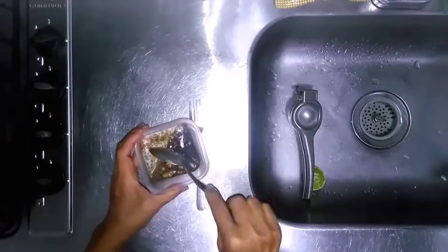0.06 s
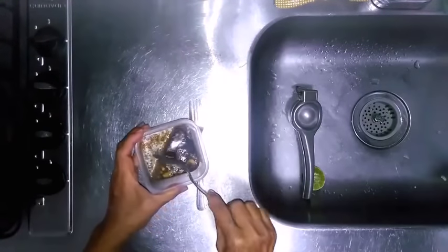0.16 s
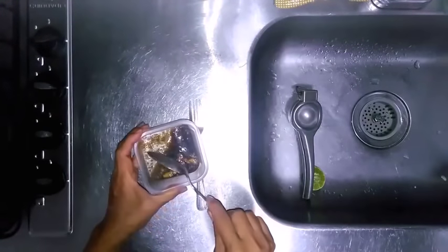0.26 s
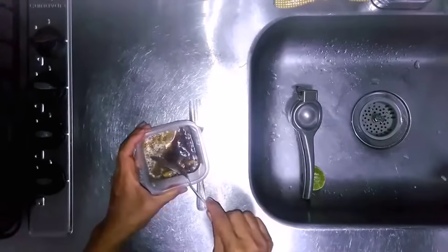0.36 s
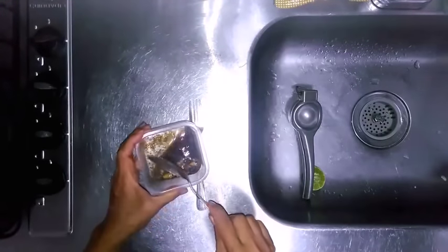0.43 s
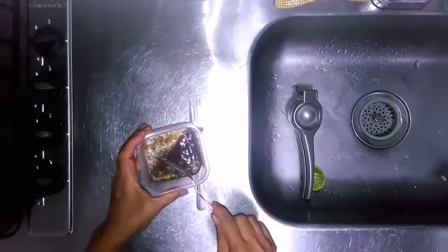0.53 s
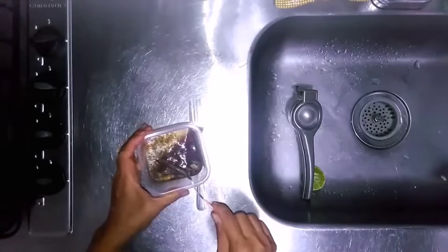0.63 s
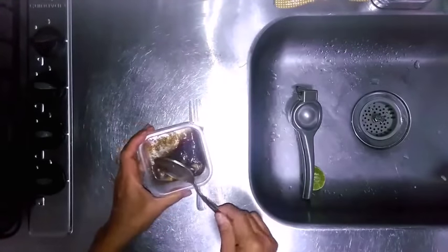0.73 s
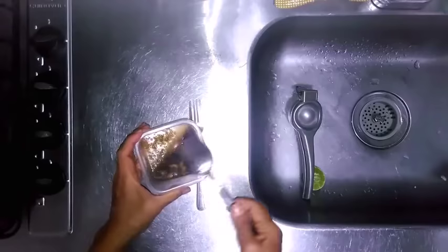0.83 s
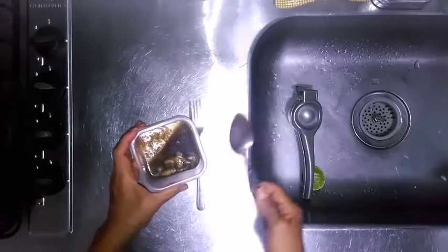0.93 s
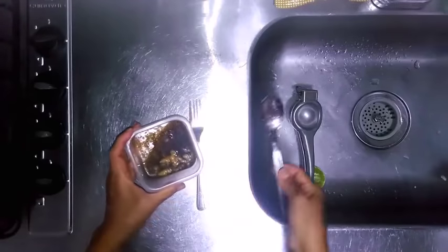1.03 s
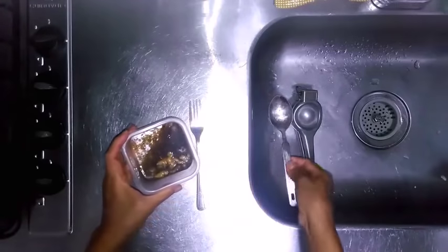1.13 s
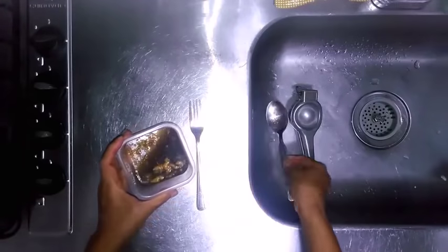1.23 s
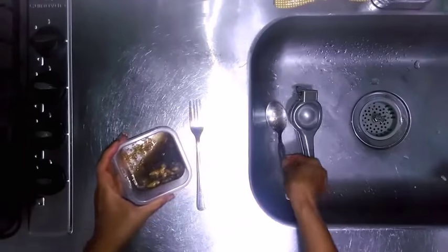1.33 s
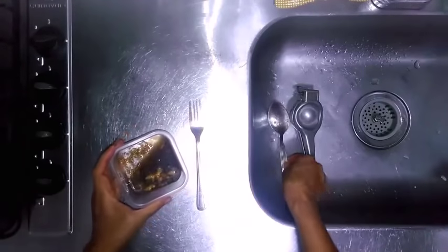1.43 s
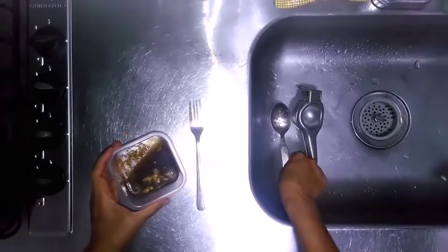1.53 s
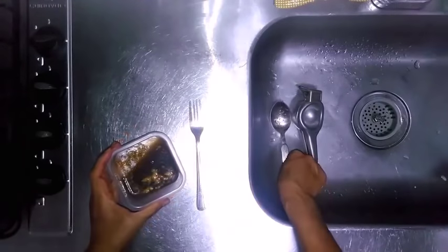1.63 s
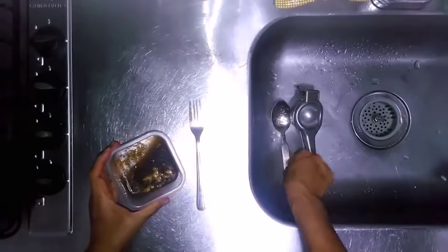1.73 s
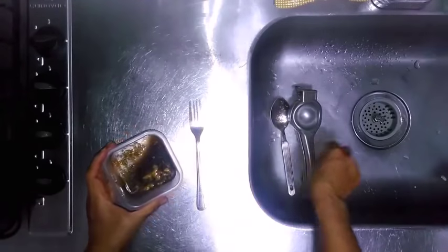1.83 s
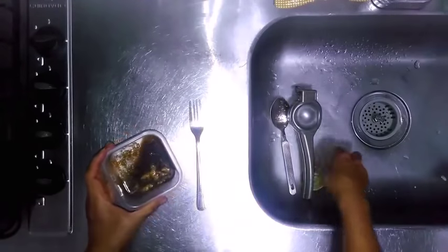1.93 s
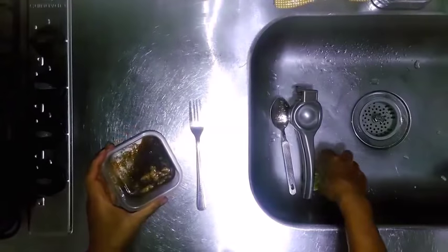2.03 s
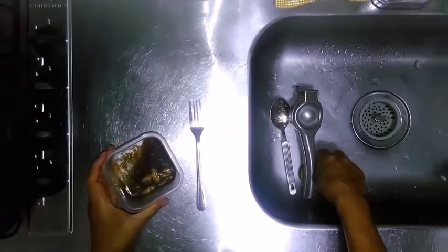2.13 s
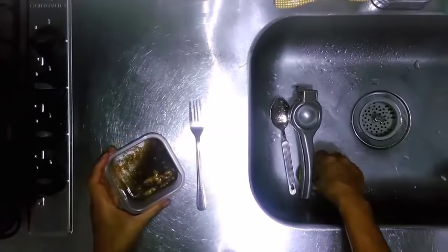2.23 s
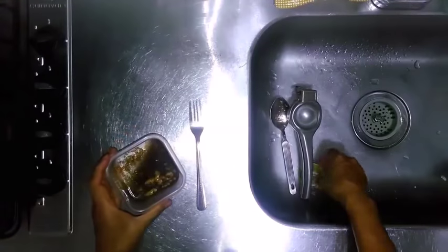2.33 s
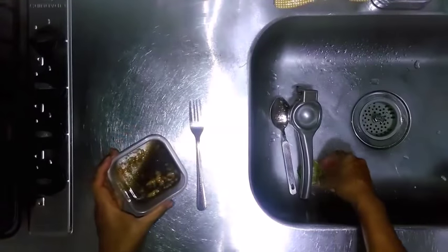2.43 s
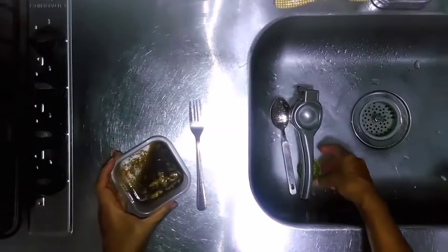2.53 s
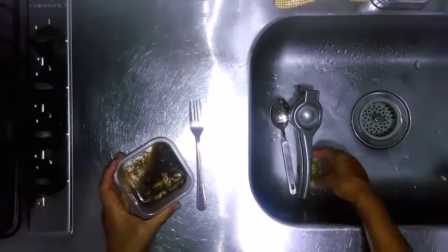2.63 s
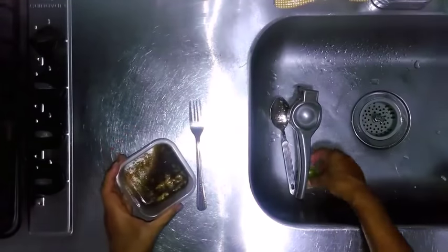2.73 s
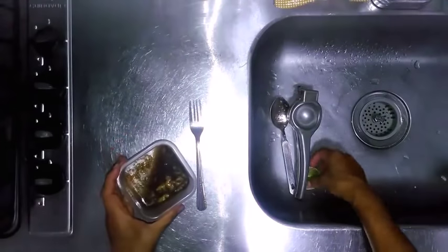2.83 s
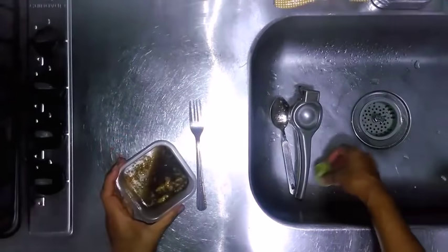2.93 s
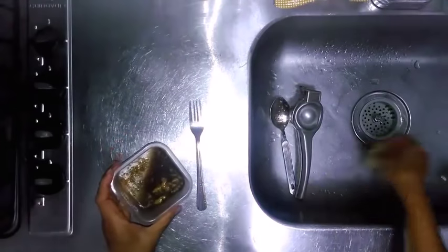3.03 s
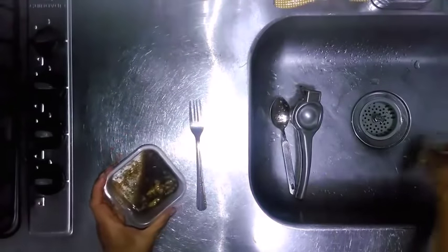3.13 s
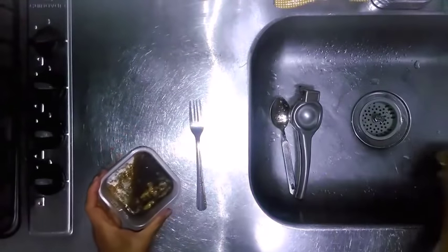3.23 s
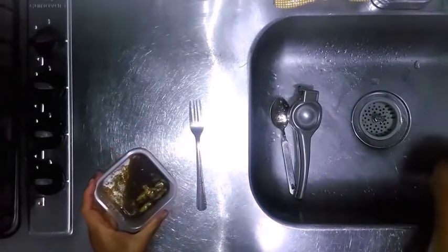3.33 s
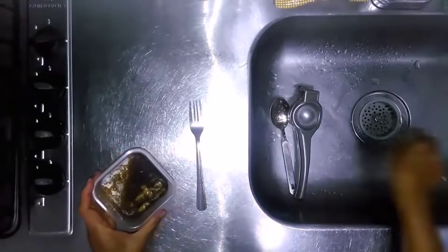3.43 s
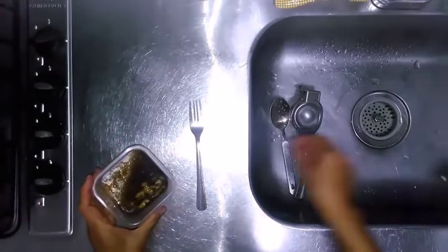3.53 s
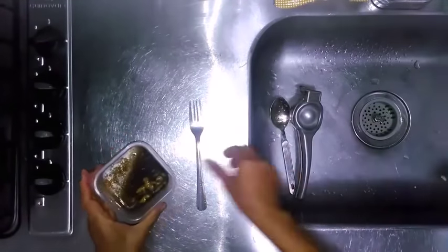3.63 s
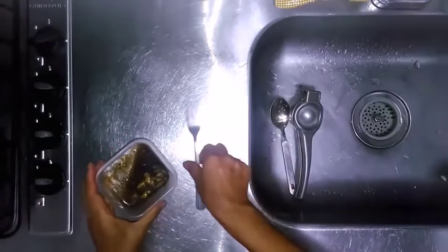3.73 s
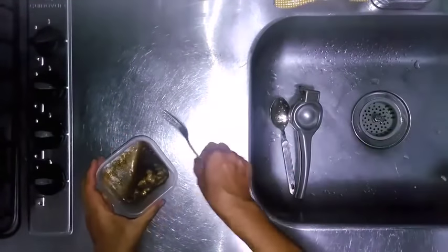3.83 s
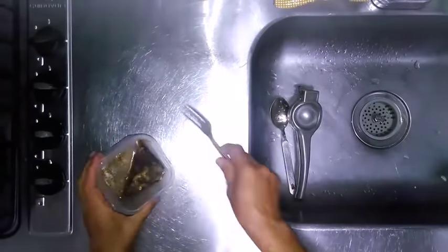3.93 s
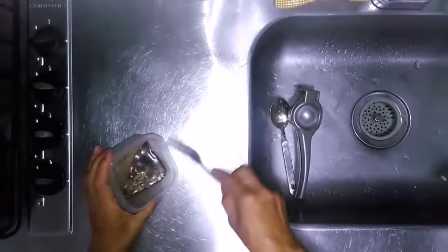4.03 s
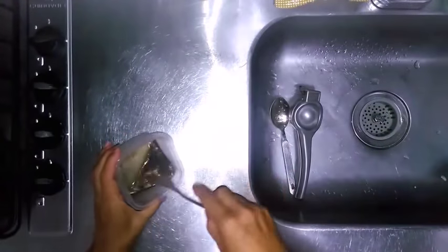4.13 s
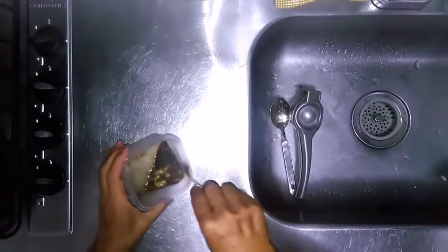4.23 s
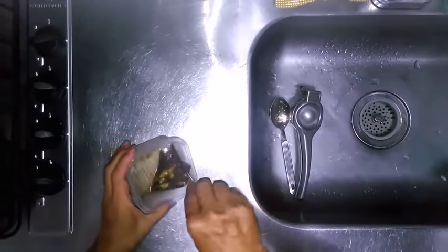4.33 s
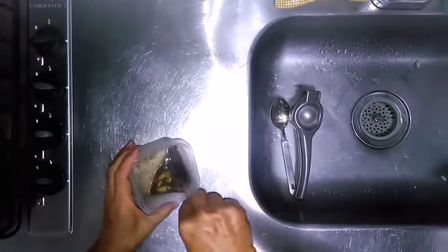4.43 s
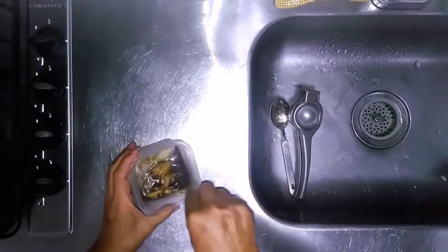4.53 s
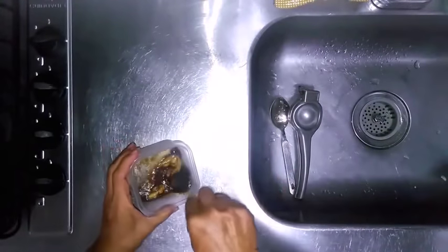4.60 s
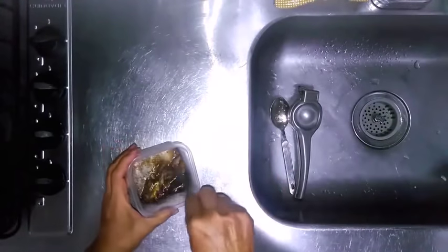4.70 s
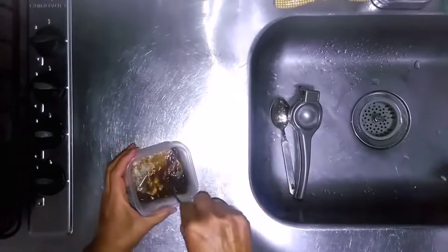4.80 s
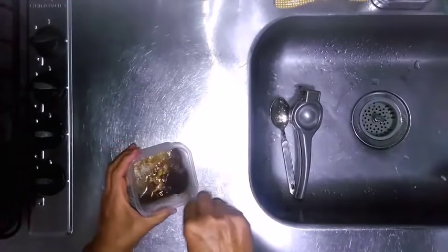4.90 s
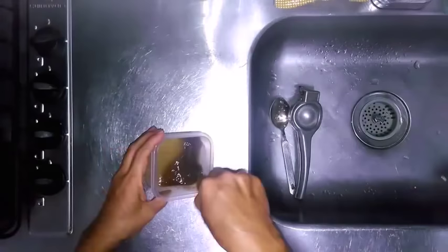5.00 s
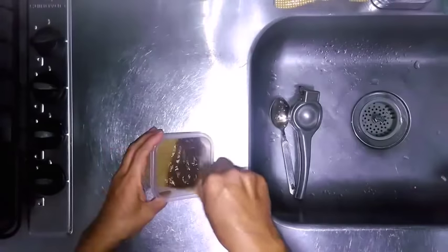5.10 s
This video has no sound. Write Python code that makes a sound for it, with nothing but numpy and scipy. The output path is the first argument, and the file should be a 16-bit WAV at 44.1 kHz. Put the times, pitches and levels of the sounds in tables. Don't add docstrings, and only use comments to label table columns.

```python
import sys
import numpy as np
from scipy import signal
from scipy.fft import rfft, irfft, next_fast_len
from scipy.io import wavfile
from scipy.ndimage import uniform_filter1d, map_coordinates

SR = 44100
rng = np.random.default_rng(int(sys.argv[2]) if len(sys.argv) > 2 else 0)


def unload_audio(sound):
    columns = np.transpose(np.atleast_2d(sound))
    steps = np.round(np.clip(columns, -1, 1) * 32767)
    wavfile.write(sys.argv[1], SR, steps.astype(np.int16))


def gain_from_db(level_db):
    decades = np.asarray(level_db, float) / 20
    return 10 ** decades


N = 227497

BUMP_EVENTS = [(0.02, -63, 6, -6, 880), (0.06, -66.5, 9, -12, 930), (2.1309, -44, -6, -11, 450),
               (2.2234, -46.5, -6.5, -12, 890), (2.2477, -50, -1, -21, 442), (2.268, -54.5, 5, -21, 700),
               (2.3236, -45, -7.5, -13, 800), (2.39, -65, 2, -20, 450), (2.435, -65.5, 3, -18, 780),
               (2.49, -63, 0, -20, 470), (2.5794, -15.5, -15.5, -29, 441), (2.5862, -14, -18.5, -25, 877),
               (2.596, -22, -9.5, -22, 614), (2.6148, -27.5, -12, -23, 441),
               (2.9045, -40, -15.5, -23, 1080), (3.7535, -48, -10, -10.5, 441), (3.7834, -49, -8, -9, 441),
               (4.1452, -54.5, -20, -11.5, 441), (4.245, -60.5, -9.5, -7, 441)]
RAP_EVENTS = [(0.2844, -14.5, -19.5, -47, 1170), (0.2945, -20, -16.5, -44, 610),
              (0.307, -26, -11.5, -46, 1170), (0.4468, -23.5, -23.5, -38, 1180),
              (0.4537, -15, -15.5, -37, 1190), (0.472, -24.5, -10.5, -39.5, 1180),
              (0.6175, -14, -12.5, -37.5, 1280), (0.6215, -19.5, -7.5, -39.5, 926),
              (0.7594, -10.5, -16, -45, 1230), (0.768, -19.5, -6, -45, 1340), (0.79, -27, -5, -44.5, 940)]
CLANK_EVENTS = [(1.4567, -10.5, -16.5, -27, 1650), (1.463, -16, -17.5, -29, 1480),
                (1.473, -13, -11, -34.5, 1650), (1.483, -17, -9.5, -36.5, 1620),
                (1.4914, -18.5, -12, -27, 1060), (1.503, -19, -13.5, -32, 1700),
                (1.513, -18.5, -12.5, -27, 2050), (1.524, -18.5, -13, -27, 1650),
                (1.536, -24.5, -14.5, -26.5, 1500), (1.547, -23.5, -11.5, -22.5, 1650),
                (1.6167, -9, -31.5, -31.5, 2650), (1.6215, -8, -26, -33.5, 2650),
                (1.629, -14, -20.5, -35, 2170), (1.6428, -19, -23, -31.5, 2650),
                (3.8494, -44, -36, -20, 1650)]
THUD_EVENTS = [
    (3.322, -51.5, 10, 13, 441),
    (3.4298, -40, 9, -6, 441),
    (3.4381, -35, 7, -14, 441),
    (3.4529, -23, -14.5, -17.5, 690),
    (3.4785, -38.5, -2, -8.5, 810),
    (3.5168, -30, 1, -6.5, 441),
    (3.536, -28, -6.5, -11, 1085),
    (3.555, -37, 1, -5.5, 1100),
    (3.5746, -41.5, 7, -17, 441),
    (3.592, -43.5, 4, -19, 1095),
]
KNOCK_EVENTS = [(4.39, -17.5, -20, -50.5, 1200), (4.399, -26, -5, -47, 1176),
                (4.409, -30.5, -5, -39.5, 1210), (4.42, -36.5, -3, -40, 1160),
                (4.7575, -20.5, -14, -56, 1220), (4.7651, -20, -9.5, -53, 1000),
                (4.776, -31.5, -3.5, -49, 744), (4.797, -39, 1.5, -50, 1100),
                (4.813, -34.5, -7.5, -50, 609), (5.0387, -19.5, -22, -47, 1260),
                (5.0467, -29.5, -10, -39, 1110), (5.055, -34, -8, -45, 1280)]
BRUSH_EVENTS = [(4.5285, -24, -28, -40, 1100), (4.5479, -19.5, -20, -40.5, 620),
                (4.561, -22, -15, -45, 1300), (4.5743, -19, -15.5, -51, 606),
                (4.5947, -29.5, -11, -34, 1146), (4.607, -34, -7, -40, 1130), (4.671, -32, -32, -41, 1100),
                (4.6996, -27, -21.5, -27, 610), (4.975, -32, -14, -40, 1120), (4.993, -27, -24, -28, 1090),
                (5.105, -33, -18.5, -50, 1320), (5.12, -33, -18, -50, 1320)]

# (peak time [s], level [dB], swell [s per 20 dB], fade [s per 20 dB])
STEEL_SLIDES = [(0.024, -60, 0.41, 0.12), (0.27, -63, 0.033, -0.86), (1.8, -92, 0.036, 0.5),
                (1.924, -36, 0.055, 0.1474), (2.0, -46, 0.9, 0.05), (2.134, -47, 0.00916, 0.06),
                (2.232, -52.5, 0.028, 0.05), (2.326, -55, 0.025, 0.44), (2.748, -49, 0.054, 0.3),
                (2.92, -49.5, 0.018, 0.01), (2.99, -55.5, 0.18, -0.12), (3.05, -78, .04, 2.4),
                (3.335, -61, 0.0087, 0.5948)]
# (peak time [s], level [dB], swell [s per 20 dB], fade [s per 20 dB])
PICKUP_SLIDES = [
    (0.99, -64.5, 0.23, -0.26),
    (3.768, -58, 0.029, 0.2402),
    (3.85, -39, 0.0078, 0.13),
    (3.89, -39, 0.035, 0.06),
    (3.94, -37.5, 0.01558, 0.07),
    (4.07, -75, 0.0553, -0.7),
]
# (time [s], level [dB])
SKID_LEVEL = [
    (1.86, -60.5),
    (1.9, -45),
    (1.925, -32),
    (1.945, -35.5),
    (2.03, -49),
]
# (peak time [s], level [dB], swell [s per 20 dB], fade [s per 20 dB], body level [dB])
STIR_STROKES = [
    (4.408, -46, 0.01346, 0.08, 2),
    (4.536, -37.5, 0.029, 0.15, -30),
    (4.568, -33.5, 0.049, 0.04, -6),
    (4.766, -29, 0.086, 0.06, -6),
    (4.81, -55, 0.011, 0.1, 11),
    (4.886, -43.5, 0.035, 0.12, -29),
    (5.001, -46.5, -0.36, -1.1, -2),
    (5.04, -41, 0.035, -0.1, 1),
    (5.115, -40, 0.025, -1, -13.5),
]
# (time [s], level [dB])
DRAUGHT_LEVEL = [(0, -52.5), (.3, -39.5), (.7, -52), (1, -46), (1.3, -47), (1.5, -41.5), (2, -38.5),
                 (2.4, -48), (2.7, -38), (3, -40.5), (3.15, -60), (4.3, -42), (5.15, -48.5)]
# (time [s], level [dB])
PUFF_EVENTS = [(.28, -38.5), (.74, -36), (.86, -43), (1.4, -38), (1.75, -37), (2.11, -43), (2.23, -46.5),
               (2.29, -44), (2.43, -37), (2.53, -31.5), (3.05, -38), (3.241, -36.5), (3.51, -30.5),
               (3.6, -51), (3.73, -38), (3.89, -36), (4.041, -42), (4.36, -49.5)]
# (time [s], level [dB])
GAIN_SAG = [(1.02, -0.5), (1.1, -7), (1.44, -10), (1.448, -1), (2.99, -1), (3.005, -6.5), (3.3, -1),
            (3.315, -1), (5.06, -1.5), (5.085, -23), (5.1, -8.5), (5.11, -4)]

FLOOR_MODES = [(441, 28, 1), (614, 44, -1), (700, 53, -7), (797, 40, -7.5), (877, 20, -3), (1080, 60, -9),
               (1500, 1300, -17), (2400, 300, -17.5)]
TUB_MODES = [(583.64, 32, 1), (866, 160, -4.5), (914, 70, 1.5), (1162, 130, -2), (1284, 73, 0),
             (1600, 630, -15), (2764.7, 300, -11.5)]
RIM_MODES = [(420, 130, 3), (670, 90, -2), (880, 48, -6), (1060, 70, -3.5), (1480, 100, -1.5),
             (1700, 71, 1), (2030, 80, -3.5), (2170, 80, -4), (2410, 110, -5.5), (2650, 97, -2)]
SHANK_MODES = [(1744.3, 230, -2.5), (2486.7, 110, 6.5), (4068.6, 180, -4.5), (6296.5, 70, -5),
               (10000, 330, 6), (10500, 130, 0.5), (11000, 140, -5.5), (11936, 110, -2.5)]
SPOON_MODES = [(3568, 73, -4.5), (4520, 28, 7), (5165.7, 154, -1), (6170, 90, 0), (6930, 62, 2.5),
               (8200, 130, -3.5), (9063.3, 120, -3.5), (10520, 150, -0.5)]
BIN_MODES = [(322, 96, -9), (445, 40.49, 1.5), (661.99, 64, -2), (804, 120, -2), (915.74, 88, -4.5),
             (1086, 20, 3.5), (1470, 280, -8.5), (2290, 1020, -11)]

BUFFET_COLOUR = [(12, -43), (20, -6), (87, 2.5), (100, 1), (135, -13), (176, -5), (220, -17.5),
                 (290, -51.5), (480, -120)]
HISS_COLOUR = [(76, -36), (130, -3), (162, 1.5), (218, -22), (294, -10.5), (421, -19.5), (1260, -29),
               (1390, -24.5), (1500, -28.5), (2420, -31.5), (5060, -34), (12400, -23), (15100, -42.5)]
RUB_COLOUR = [(470, -37.5), (800, -9), (1290, -3.5), (3410, -3), (4050, -6.5), (4310, -9.5), (7680, -4.5),
              (10800, 2), (14200, -15), (15100, -44.5)]
LIFT_COLOUR = [(710, -42.5), (1200, -14), (1970, -8), (2630, 0), (3930, -5.5), (4810, -4), (12800, 1),
               (14300, -16), (15100, -59.5)]
WALL_COLOUR = [(100, -49.5), (200, -2), (400, -1.5), (800, -5.5), (1500, -14), (3000, -31.5)]
STEEL_RATTLE = [(290, -32.5), (500, -10), (778, -13.5), (1250, -11.5), (1680, -10.5), (1860, -3.5),
                (2690, -10), (3020, -2.5), (3680, -6), (8420, -5), (11700, -0.5), (13900, -17.5),
                (15100, -33.5)]
PLASTIC_RATTLE = [(290, -14), (500, -8.5), (756, -11), (1300, -5), (1940, -10.5), (2110, -7), (4900, -5),
                  (5650, -8), (11200, -2), (14300, -24), (15100, -45.5)]
SCRAPE_COLOUR = [(290, -24), (500, -23.5), (602, -6), (778, -12.5), (1320, -9.5), (1780, -13.5),
                 (3480, -11.5), (11900, -9.5), (14300, -17), (15100, -49)]

# (frequency [Hz], side minus mid [dB])
PORT_WIDTH = [(60, 13), (110, 12), (200, 7), (380, 5), (690, 4), (1270, 2), (2340, 1), (4320, 0), (7960, 0),
              (14700, 0)]
# (frequency [Hz], left minus right [dB])
PORT_LEAN = [(60, 2), (110, 3.5), (200, 2.5), (380, 0.5), (690, 1), (1270, -2), (2340, -2), (4320, -2.5),
             (7960, -1.5), (14700, 13)]
# (frequency [Hz], t60 [s])
KITCHEN_T60 = [(150, 0.42114), (1000, 0.34), (4000, 0.3), (12000, 0.23)]

HISS_DB = -68
WALL_EVEN_DB, WALL_LAG = -49.5, 0.5
PUFF_SWELL_S, PUFF_FADE_S = 0.08, 0.17
FAVOUR_DB = 6.5
SHARP_DB = -17
RIPPLE_HZ = 130
PRE_S = 0.008


def unit(x):
    return x / np.sqrt(np.mean(x ** 2) + 1e-20)


def along(points, hz):
    f, v = np.transpose(points)
    return np.interp(np.log(hz + 1), np.log(f + 1), v)


def curve(rows):
    s, values = np.transpose(rows)
    return np.interp(np.arange(N) / SR, s, values)


def gate(rows, fade=0.015):
    first, last = rows[0][0], rows[-1][0]
    return np.interp(np.arange(N) / SR, [first - fade, first, last, last + fade], [0, 1, 1, 0])


def filtered(x, response):
    m = next_fast_len(x.shape[-1] + 8192)
    return irfft(rfft(x, m) * response(np.fft.rfftfreq(m, 1 / SR)), m)[..., :x.shape[-1]]


def modes(peaks):
    def response(f):
        total = 0
        for k, (c, w, db) in enumerate(peaks):
            total = total + (-1) ** k * gain_from_db(db) * 1j * f * w / (c * c - f * f + 1j * f * w)
        return total
    return response


def noise(spectrum, size=N):
    return unit(filtered(rng.standard_normal((2, size)), lambda hz: gain_from_db(along(spectrum, hz))))


def ports(pair, pan_db):
    mid, side = filtered(pair, lambda hz: np.array([hz * 0 + 1, gain_from_db(along(PORT_WIDTH, hz))]))
    return np.array([(mid + side) * gain_from_db(pan_db / 2), (mid - side) * gain_from_db(-pan_db / 2)])


def wander(rate):
    return map_coordinates(rng.standard_normal(int(N * rate / SR) + 4), [np.arange(N) * rate / SR])


def strokes(rows):
    t = np.arange(N) / SR
    gains = []
    for s, db, swell, fade, *_ in rows:
        fall = np.where(t < s, (s - t) / abs(swell), (t - s) / abs(fade))
        gains.append(gain_from_db(db - 20 * fall))
    return np.array(gains)


def patchy(x, depth_db):
    z = signal.stft(x, nperseg=256)[2]
    field = uniform_filter1d(rng.standard_normal(z.shape[1:]), size=2, axis=0)
    field = uniform_filter1d(field, size=24, axis=1)
    return signal.istft(z * gain_from_db(depth_db * unit(field)), nperseg=256)[1][:, :N]


def friction(level_db, rel_db, colour, body, grain_db, rate, side_db):
    knots = rng.exponential(1, int(N * rate / SR) + 2)
    slips = gain_from_db(grain_db * np.interp(np.arange(N) * rate / SR, np.arange(len(knots)), knots))
    hiss = unit(patchy(noise(colour), depth_db=3.5) * slips)
    shake = filtered(rng.standard_normal((2, N)) * slips, body)
    shake = unit(patchy(shake, depth_db=5.5))
    return gain_from_db(level_db) * (hiss + gain_from_db(rel_db) * shake * gain_from_db([[0], [side_db]]))


def kitchen(pair, wet_db, blur_hz):
    hz, t, z = signal.stft(rng.standard_normal(pair.shape), SR, nperseg=256)
    decay = gain_from_db(-60 * t / along(KITCHEN_T60, hz)[:, None])
    tail = signal.istft(z * decay, SR, nperseg=256)[1][:, :pair.shape[1]]
    power = uniform_filter1d(np.abs(rfft(pair)) ** 2, int(blur_hz * pair.shape[1] / SR), axis=1)
    spectrum = rfft(tail / np.linalg.norm(tail[0])) * np.sqrt(np.abs(power))
    return gain_from_db(wet_db) * irfft(spectrum, pair.shape[1])


def contact_rattle(t, colour, rise, t60, snap_db, sing_db):
    after = np.maximum(t, 0)
    onset = 1 - np.exp(-after / rise)
    graze = gain_from_db(-17 + 3800 * np.minimum(t, 0) - 60 * after / 0.008) * (t > -0.006)
    strike = gain_from_db(-60 * after / t60) * onset
    snap = gain_from_db(snap_db) * gain_from_db(-60 * after / 0.013) * (t > 0.001) * [[0.5], [1]]
    chatter = gain_from_db(2.6 * np.repeat(rng.exponential(1, len(t) // 30), 30) - 3.5)
    ripple_db = 2.8 * rng.standard_normal(int(SR / 2 / RIPPLE_HZ) + 2)
    ripple = lambda hz: gain_from_db(np.interp(hz / RIPPLE_HZ, np.arange(len(ripple_db)), ripple_db))
    rough = unit(filtered(noise(colour, size=len(t)), ripple))
    steel = unit(filtered(rng.standard_normal((2, len(t))), modes(SHANK_MODES)))
    return rough * (graze + strike * chatter + snap) + gain_from_db(sing_db - 60 * after / 0.061) * onset * steel


def contact_push(t, rise, push):
    after = np.maximum(t, 0)
    shove = rng.standard_normal((2, len(t))) * gain_from_db(-60 * after / push) * (1 - np.exp(-2.5 * after / rise))
    firm = 1.0 * (np.arange(len(t)) == round((PRE_S + 0.4 * rise) * SR))
    turned = filtered(firm, lambda hz: np.array([[1], [1j]]) + 0 * hz)
    return shove + gain_from_db(0.5) * np.linalg.norm(shove[0]) * turned


def struck_modes(body, ring_hz):
    peaks = []
    for (c, w, db), (shift, weight) in zip(body, rng.normal(0, 1, (len(body), 2))):
        far_db = FAVOUR_DB * abs(np.log2(c / ring_hz))
        peaks.append((c * (1 + 0.01 * shift), w, db + weight - far_db))
    return modes(peaks)


def blows(events, colour, body, low_hz, lead, rise, push, body_db, side_db, wet_db, sing_db, snap_db,
          pop_s, pop_db, t60, pan_db, blur_hz):
    out = np.zeros((2, N + SR))
    t = np.arange(SR // 2) / SR - PRE_S
    after = np.maximum(t, 0)
    small = lambda hz: (1j * hz / (1j * hz + 0.5 * body[0][0])) ** 2
    low_modes = modes([(low_hz, 30, 0), (1.55 * low_hz, 40, -6)])
    for s, db, rel_db, low_db, ring_hz in events:
        rattle = contact_rattle(t, colour, rise, t60, snap_db, sing_db)
        shove = contact_push(t, rise, push)
        knock = filtered(filtered(shove, struck_modes(body, ring_hz)), small)
        knock = gain_from_db(rel_db + body_db) * knock / np.abs(knock).max()
        thump = filtered(shove, low_modes)
        thump = gain_from_db(low_db + 4.5) * thump / np.abs(thump).max()
        room = kitchen(rattle, wet_db, blur_hz=109.8)
        room = room + kitchen(knock + 0.62 * thump, wet_db + 2.5, blur_hz=blur_hz)
        room = room * (1 - np.exp(-after / 0.0017)) * np.clip((0.45 - t) / 0.1, 0, 1)
        pop = np.sin(2 * np.pi * ring_hz * after + [[0], [np.pi / 2]])
        pop = pop * gain_from_db(rel_db + pop_db - 60 * after / pop_s) * (1 - np.exp(-after / 0.0011))
        pop = filtered(pop, small) * [[0.45], [1]]
        whole = rattle + (knock + thump) * gain_from_db([[0], [side_db]]) + room + pop
        start = round((s - PRE_S - lead) * SR)
        out[:, start:start + len(t)] += gain_from_db(db) * ports(whole, pan_db)
    return out[:, :N]


def draught():
    a, b = noise(BUFFET_COLOUR)
    hum = np.sin(2 * np.pi * np.cumsum(82 * (1 + 0.09 * wander(9))) / SR)
    puffs = strokes([(s, db, PUFF_SWELL_S, PUFF_FADE_S) for s, db in PUFF_EVENTS]).sum(axis=0)
    eddies = gain_from_db(3 * wander(22))
    gain = eddies * (gain_from_db(curve(DRAUGHT_LEVEL) - 0.5) + puffs)
    side = gain * unit(hum + 1.2 * a)
    mid = gain * gain_from_db(-18) * b
    return np.array([mid + side, mid - side])


def room_hiss():
    return gain_from_db(HISS_DB) * ports(noise(HISS_COLOUR), 0.1)


def slides():
    singing = unit(filtered(rng.standard_normal((2, N)), modes(SPOON_MODES)))
    out = gate(SKID_LEVEL) * gain_from_db(curve(SKID_LEVEL)) * singing
    wall = lambda hz: gain_from_db(along(WALL_COLOUR, hz)) * (1.3 + 0.25 * modes(FLOOR_MODES)(hz))
    for rows, colour, wall_db in [(STEEL_SLIDES, RUB_COLOUR, -4.0), (PICKUP_SLIDES, LIFT_COLOUR, -11)]:
        level_db = 20 * np.log10(strokes(rows).sum(axis=0) + 1e-9)
        rel_db = np.minimum(wall_db - WALL_LAG * (level_db - WALL_EVEN_DB), 18)
        out = out + friction(level_db, rel_db, colour, wall, grain_db=0.5, rate=400, side_db=0.0)
    return ports(out, 0.1)


def lime_bumps():
    return blows(BUMP_EVENTS, STEEL_RATTLE, FLOOR_MODES, low_hz=268.64, lead=0.0031, rise=0.0067, push=0.053,
                 body_db=7, side_db=-1.0, wet_db=-1.5, sing_db=-5.5, snap_db=-20.0,
                 pop_s=0.055, pop_db=4.5, t60=0.043, pan_db=0.5, blur_hz=71)


def spoon_raps():
    return blows(RAP_EVENTS, PLASTIC_RATTLE, TUB_MODES, low_hz=244.5, lead=0.00087, rise=0.003095, push=0.021,
                 body_db=5, side_db=8.5, wet_db=-1.5, sing_db=-28.0, snap_db=0.5,
                 pop_s=0.021, pop_db=13.5, t60=0.046, pan_db=0.3, blur_hz=170)


def cutlery_clanks():
    return blows(CLANK_EVENTS, STEEL_RATTLE, RIM_MODES, low_hz=267, lead=0.0016, rise=0.0057, push=0.037,
                 body_db=5.5, side_db=0.5, wet_db=1.0, sing_db=-13.5, snap_db=-3,
                 pop_s=0.022, pop_db=2.5, t60=0.046, pan_db=1.7, blur_hz=150.4)


def peel_thuds():
    return blows(THUD_EVENTS, STEEL_RATTLE, BIN_MODES, low_hz=180.0, lead=0.0034, rise=0.021867, push=0.079,
                 body_db=5.0, side_db=2.0, wet_db=-2.5, sing_db=-25, snap_db=-18,
                 pop_s=0.056, pop_db=7.5, t60=0.081, pan_db=-0.5, blur_hz=58)


def fork_knocks():
    return blows(KNOCK_EVENTS, PLASTIC_RATTLE, TUB_MODES, low_hz=243.0, lead=0.00086, rise=0.0034, push=0.014,
                 body_db=3.0, side_db=8.5, wet_db=-2.5, sing_db=-27.0, snap_db=-2.5,
                 pop_s=0.033, pop_db=13.0, t60=0.039, pan_db=2.0, blur_hz=170)


def stir():
    thin = lambda hz: modes(TUB_MODES)(hz) / (1 + (420 / (hz + 1)) ** 6)
    each = strokes(STIR_STROKES)
    level = each.sum(axis=0) + 1e-9
    rel_db = np.array([row[-1] for row in STIR_STROKES]) @ each / level
    scrape = friction(20 * np.log10(level), rel_db - 3.5, SCRAPE_COLOUR, thin,
                      grain_db=2.0, rate=250, side_db=-2.0)
    return ports(scrape, -0.49)


def tine_brushes():
    return blows(BRUSH_EVENTS, PLASTIC_RATTLE, TUB_MODES, low_hz=242.58, lead=0.0036, rise=0.0089, push=0.019,
                 body_db=-1.5, side_db=-2, wet_db=0.0, sing_db=-30.0, snap_db=-6.5,
                 pop_s=0.074, pop_db=6, t60=0.051, pan_db=1.0, blur_hz=130)


def scene():
    air = draught() + room_hiss()
    sink = slides() + lime_bumps() + cutlery_clanks() + peel_thuds()
    tub = spoon_raps() + fork_knocks() + stir() + tine_brushes()
    return air + sink + tub


def roll_off(x):
    return signal.sosfilt(signal.butter(12, 15260, fs=SR, output="sos"), x)


def record(dry):
    def port_colour(hz):
        top_loss_db = 33 / (1 + np.exp((14600 - hz) / 150))
        return gain_from_db(along(PORT_LEAN, hz) * np.array([[0.5], [-0.5]]) - top_loss_db)

    x = filtered(dry, port_colour)
    t = np.arange(N) / SR
    firsts = RAP_EVENTS + KNOCK_EVENTS[:1] + CLANK_EVENTS[:1] + CLANK_EVENTS[10:11] + BUMP_EVENTS[:11]
    sharp = [row[0] for row in firsts if row[1] > SHARP_DB]
    hole = sum(np.exp(-((t - s + 0.0105) / 0.004) ** 4) for s in sharp)
    treble = filtered(x, lambda hz: 1 / (1 + (1800 / (hz + 1)) ** 4))
    x = (x - hole * treble) * gain_from_db(curve(GAIN_SAG))
    x = x / (1 + np.abs(x / 0.86) ** 4) ** 0.25
    return roll_off(x)


dry = scene()
out = record(dry)
unload_audio(out)
```